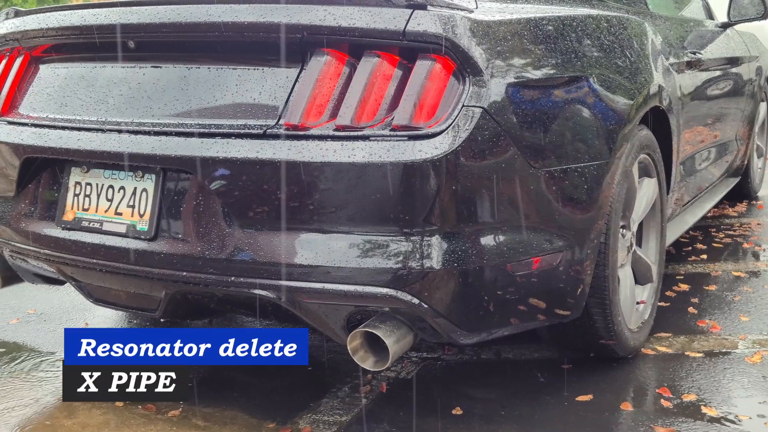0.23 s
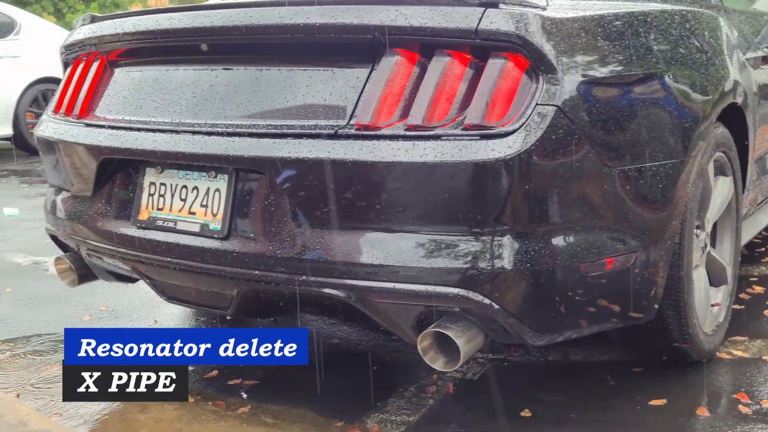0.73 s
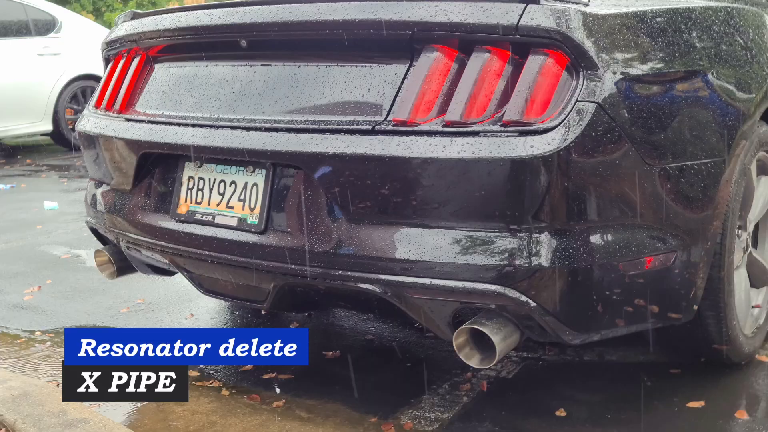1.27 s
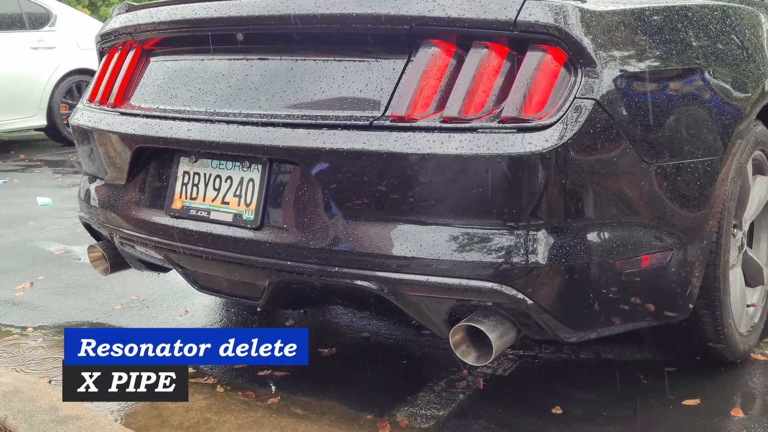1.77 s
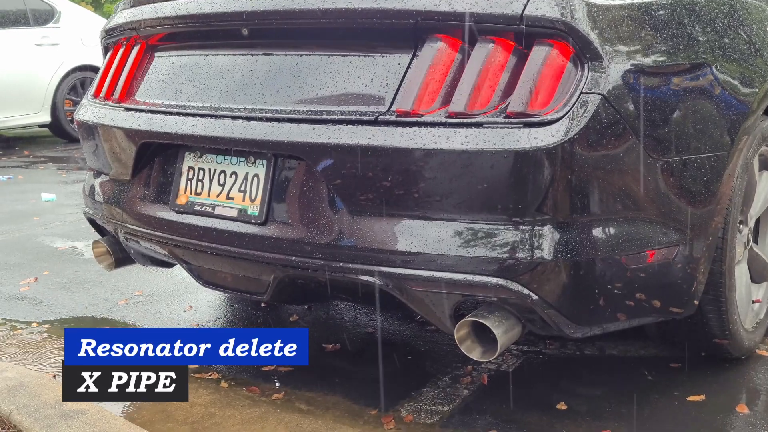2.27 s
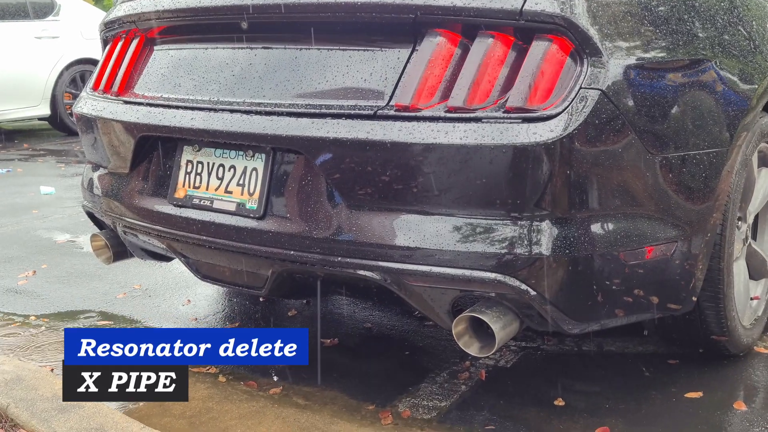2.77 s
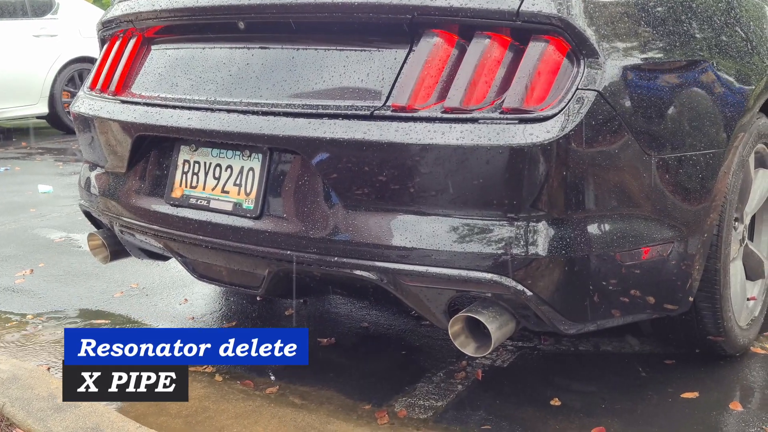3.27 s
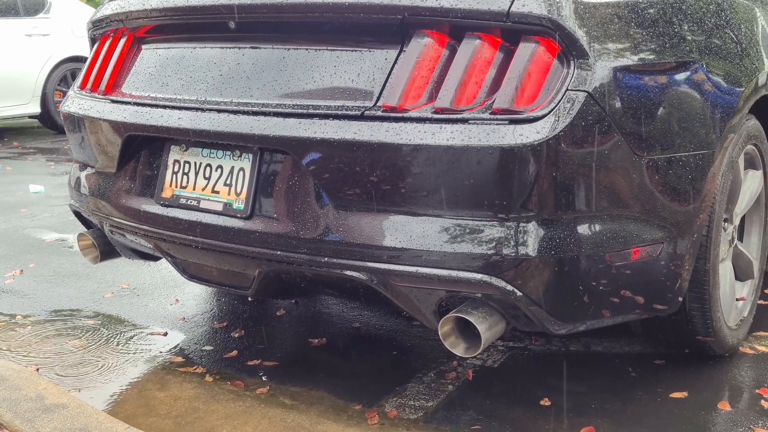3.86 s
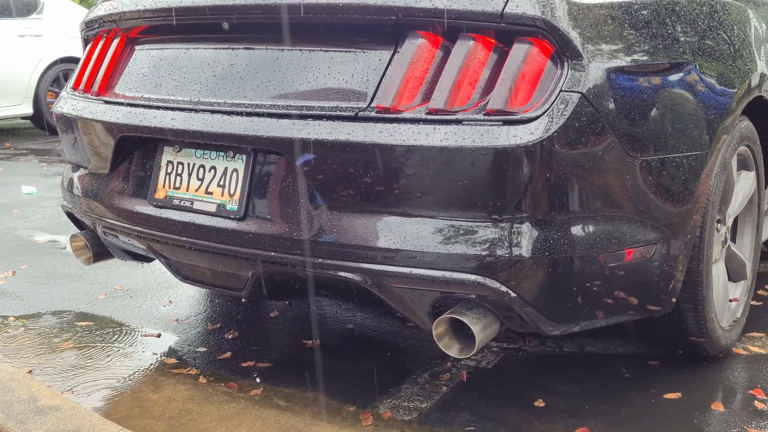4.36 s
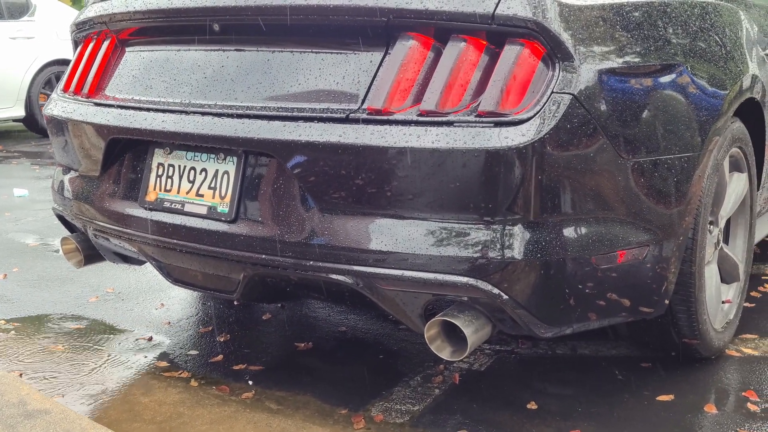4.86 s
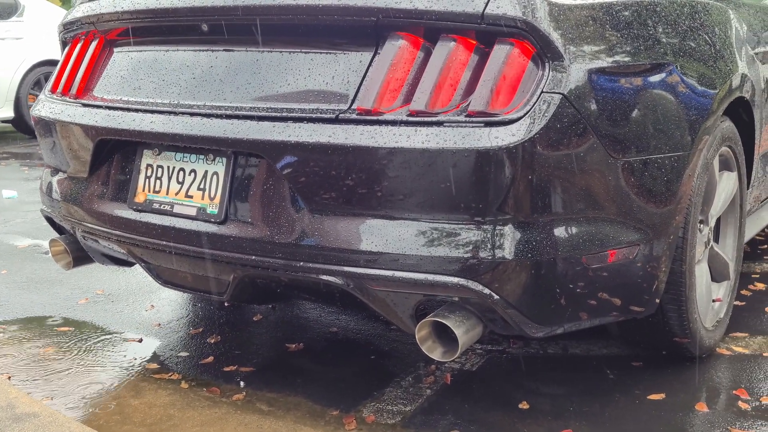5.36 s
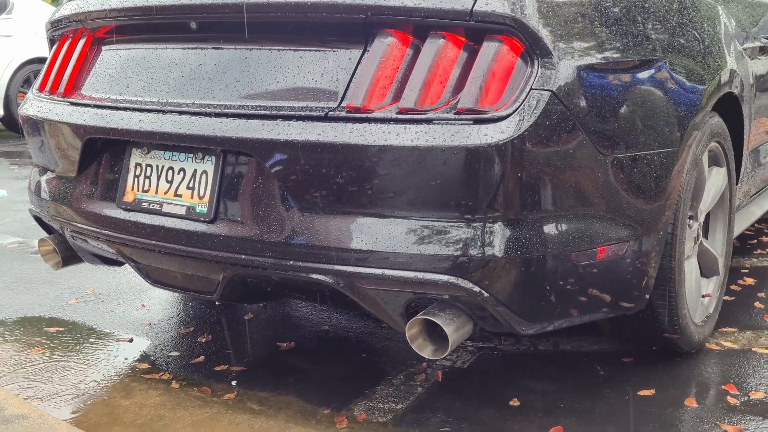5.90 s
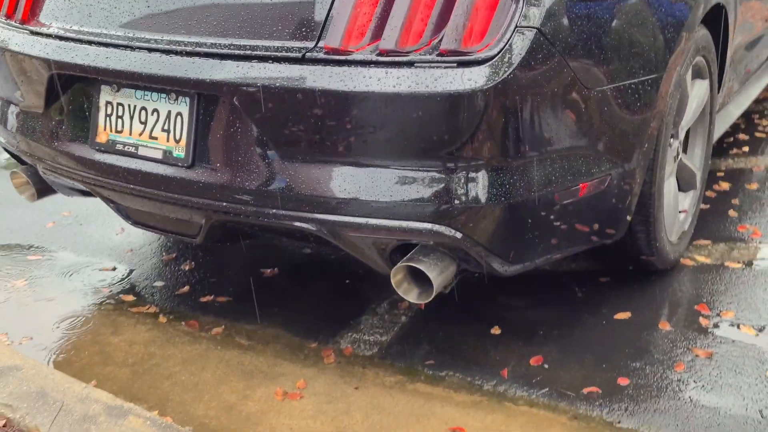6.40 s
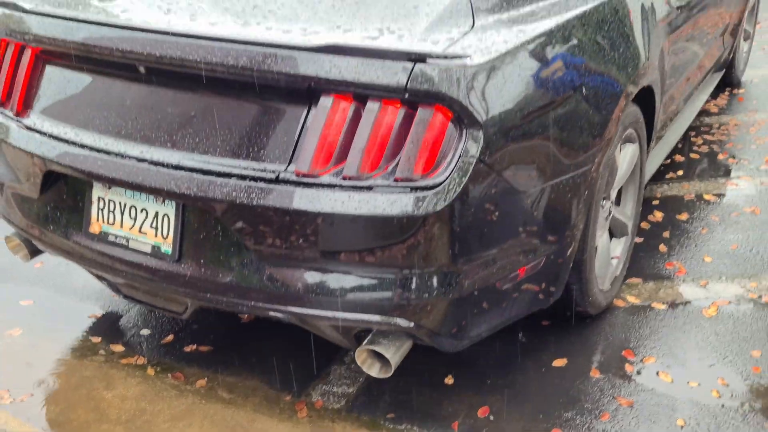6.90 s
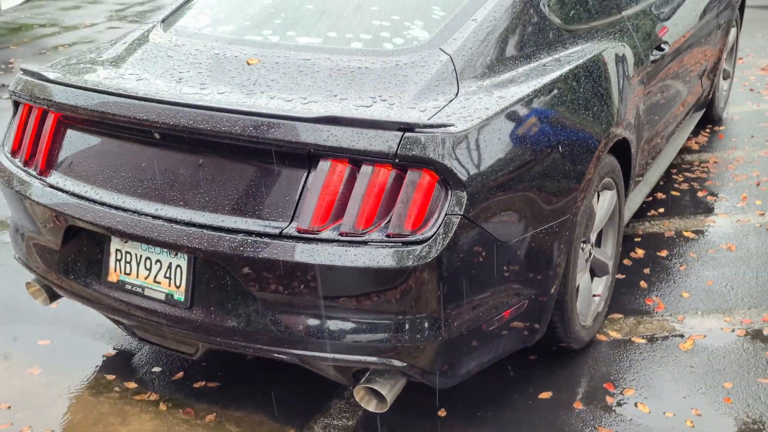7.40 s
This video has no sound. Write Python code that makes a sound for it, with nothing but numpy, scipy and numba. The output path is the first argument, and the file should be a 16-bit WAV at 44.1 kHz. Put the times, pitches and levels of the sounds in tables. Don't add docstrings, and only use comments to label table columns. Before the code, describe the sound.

A big eight-cylinder car engine settles from fast to slow idle through open pipes, deep and lumpy, with rasps, puffs and faint rain hiss.

```python
import sys
import numpy as np
from scipy import signal
from scipy.fft import rfft, irfft
from scipy.io import wavfile
from scipy.ndimage import uniform_filter1d
from numba import njit

SR = 44100
rng = np.random.default_rng(int(sys.argv[2]) if len(sys.argv) > 2 else 0)


def natural_amplitude(level_db):
    exponent = np.asarray(level_db, float) / 20
    return 10 ** exponent


def dump_mix(stems):
    frames = np.atleast_2d(stems).T
    limited = np.clip(frames, -1, 1)
    pcm = np.round(limited * 32767).astype(np.int16)
    wavfile.write(sys.argv[1], SR, pcm)


N = 336924
LEAD = 6615
SIZE = N + LEAD
TIME = np.arange(-.15 * SR, N) / SR
SIDES = np.array([[1], [-1]])

# near_tip_strength, far_tip_strength, body_strength,
# near_tip_lag_ms, far_tip_lag_ms, body_lag_ms
CYLINDERS = [(1.19, 0.25, 0.3, -0.45, -2.74, -0.25), (0.93, 0.45, 0.89, -0.03, -2.82, 4.71),
             (0.98, 0.95, 0.82, -1.01, -0.9, 0.65), (1.06, 0.64, 0.96, -0.07, 0.35, 0.26),
             (1.44, 0.65, 0.92, -0.28, 0.66, 0.06), (1.12, 0.8, 0.49, -0.48, -3.47, 0.03),
             (1.35, 0.57, 0.87, -0.7, -3.95, -0.71), (1.12, 1.02, 0.92, -0.15, -0.07, 0.57)]
# start_s (middle of the swell or
# dip), length_s, level_db
SPITS = [(0.04, 0.0086, 8), (0.142, 0.008, 3.5), (0.239, 0.008, 1.5), (0.339, 0.0071, 5),
         (1.104, 0.0088, -4), (1.272, 0.013, 5), (2.567, 0.018, 7), (3.051, 0.015, 6.5), (3.172, 0.011, 9),
         (3.288, 0.0087, 7), (5.38, 0.0067, -8), (6.583, .015, 4.5), (6.826, .008, -5), (6.893, .008, 0),
         (6.964, 0.0045, 5), (7.038, 0.0084, 6), (7.25, 0.0094, -1), (7.444, .008, -2), (7.567, .008, -6)]


def level(x):
    return x / np.sqrt(np.mean(x ** 2))


def noise():
    return rng.standard_normal(SIZE)


def walk(rate_hz):
    hold = int(SR / rate_hz)
    steps = np.repeat(rng.standard_normal(SIZE // hold + 1), hold)
    smooth = uniform_filter1d(uniform_filter1d(steps, hold), hold)
    return 4 / 3 * smooth[:SIZE]


def curve(table):
    time_s, value = np.transpose(table)
    return np.interp(TIME, time_s, value)


def bumps(table, t):
    return sum(db * np.exp(-((t - s) / length) ** 2) for s, length, db in table)


def clicks(times, sizes):
    place = np.clip(times * SR + LEAD, 0, SIZE - 2)
    whole = place.astype(int)
    part = place - whole
    return np.bincount(whole, sizes * (1 - part), SIZE) + np.bincount(whole + 1, sizes * part, SIZE)


def fade(x, decay_s):
    return signal.lfilter([1], [1, -np.exp(-1 / (decay_s * SR))], x)


def colour(x, table):
    hz, db = np.transpose(table)
    bin_hz = np.arange(len(x) // 2 + 1) * SR / len(x)
    gain = natural_amplitude(np.interp(np.log(bin_hz + 1), np.log(hz), db))
    return irfft(rfft(x) * gain, len(x))


@njit
def svf(x, hz, width):
    y, b, l = np.empty(len(x)), 0., 0.
    g, k = np.tan(np.pi * hz / SR), width / hz
    for i in range(len(x)):
        v = (b + g * (x[i] - l)) / (1 + g * (g + k))
        b, l, y[i] = 2 * v - b, l + 2 * g * v, k * v
    return y


def steep(x, hz, width_hz):
    return svf(svf(x, float(hz), float(width_hz)), float(hz), 2. * width_hz)


def ring(x, modes, lift):
    total = 0
    for k, (hz, width_hz, low_db, high_db) in enumerate(modes):
        gain = natural_amplitude(low_db + lift * (high_db - low_db))
        total = total + (-1) ** k * gain * steep(x, hz, width_hz)
    return total


def rain(gate):
    # pitch_hz, level_db (per Hz)
    rain_colour = [(2000, -28.5), (3200, -15), (4500, -11), (5500, -9.5), (7200, -9.5), (8000, -15.5),
                   (11000, -15.5), (15500, -21)]
    count = 9000
    ports = []
    for _ in range(2):
        sizes = natural_amplitude(1.05 * rng.exponential(size=count)) * noise()[:count]
        drops = clicks(rng.uniform(TIME[0], TIME[-1], count), sizes)
        hiss = (.6 + .4 * gate) * natural_amplitude(1.9 * walk(22)) * noise()
        ports.append(colour(hiss + 0.67 * level(drops), rain_colour))
    shared = 0.12 * (ports[0] + ports[1])
    return level(np.array(ports) + shared)


def rasp():
    # start_s (middle of the swell), length_s, level_db
    rasps = [
        (0.494, 0.022, 17),
        (4.005, .03, 14),
        (4.748, 0.029, 19),
        (5.05, .015, 16),
        (5.14, .04, 22),
        (5.24, .025, 15),
        (6.38, 0.038, 16.5),
    ]
    torn = steep(noise() * natural_amplitude(3.0 * walk(90)), 1490, 920)
    return level(torn) * natural_amplitude(-57 + bumps(rasps, TIME))


def puffs(cycle, lift):
    # place (0-1), level_db
    cycle_puffs = [(.08, 11), (0.223, 8), (0.458, 8), (.685, 3.5), (0.839, 5)]
    # pitch_hz, width_hz, low_phone_db, lifted_phone_db
    puff_modes = [(2575, 230, -8.5, -4), (2947, 290, 4, 2.5), (3280, 240, -1.5, -7.5),
                  (3806, 580, 4.5, 3.5), (4300, 170, 5, 5.5), (4610, 390, 1, 0), (5570, 310, -10.5, -21.5),
                  (6560, 300, -14, -37)]
    place, db = np.transpose(cycle_puffs)
    turns = (np.arange(-2, int(cycle[-1]) + 1)[:, None] + place).ravel()
    size = natural_amplitude(np.resize(db, len(turns)) + 2.2 * rng.standard_normal(len(turns)))
    size = size * (turns > cycle[0])
    starts = clicks(np.interp(turns, cycle, TIME) - .003, size)
    gate = fade(fade(starts, 0.00029), 0.009)
    gate = gate / gate.mean() + 1.47
    mid, side = (ring(gate * noise(), puff_modes, lift) for _ in range(2))
    side = .5 * side + .7 * np.roll(mid, 9)
    return (mid + side * SIDES) / np.std(mid), gate / gate.mean()


def cracks(times, which, lift):
    front_db = [-1, 0, -12, 2.5, 0, 0, 1, 0]
    # pitch_hz, width_hz, low_phone_db, lifted_phone_db
    crack_modes = [(868, 112, -18.5, 12.5), (1051, 85, -4, 1), (1175, 105, 2.5, -1.5), (1352, 74, -6, 16.5),
                   (1466, 66, 1.5, -9.5), (1759, 213, -5.5, 4.5), (2198, 116, -36, 8.5),
                   (2367, 120, -19.5, -6.5)]
    chance_db = 1.6 * rng.standard_normal(len(times))
    size = natural_amplitude(np.array(front_db)[which] + bumps(SPITS, times) + chance_db)
    front = clicks(times - 0.003487, size)
    gate = fade(front, .004) + .33
    mid, side = (ring(gate * noise(), crack_modes, lift) for _ in range(2))
    mid = mid + 7.5 * ring(front, crack_modes, lift)
    side = .35 * side + .4 * np.roll(mid, 25)
    heard = mid + side * SIDES
    return heard / np.sqrt(uniform_filter1d(mid ** 2, size=SR // 2))


def bumper(times, lift):
    rung = steep(clicks(times, np.ones(len(times))), 516.5, 22.)
    return level(rung) * np.clip((lift - .4) / .28, 0, 1)


def bark(times, which, lift):
    tip_db = [-5.5, 6, 6, 10, -5.5, 1, 1, 8]
    # pitch_hz, width_hz, low_phone_db, lifted_phone_db
    bark_modes = [(346, 88, -1.5, 5.5), (463, 31, 17, -52.5), (513.6, 66, -6.5, -3.5),
                  (570, 42, 0.5, -19.5), (639, 62, -16, -4.5)]
    late, loud = rng.standard_normal((len(times), 2)).T
    far_lag_s = np.array(CYLINDERS)[which, 4] / 1000
    starts = times - 0.001968 + far_lag_s + .00015 * late
    pulses = clicks(starts, natural_amplitude(np.array(tip_db)[which] + 1.5 * loud))
    flow = level(fade(pulses, 0.005)) * noise()
    return level(ring(level(pulses) + .45 * flow, bark_modes, lift))


def boom(times, which, lift):
    # pitch_hz, width_hz, near_tip_gain, far_tip_gain, body_gain (minus = inverted)
    pipe_modes = [(51, 8, -7.85, 1.07, 3.56), (65, 70, -0.34, -0.92, -0.23), (95, 8, -7.7, -3.59, 0.05),
                  (109, 26, 2.39, -0.61, 0.9), (131, 23, 0.36, 2.14, 1.82), (158, 51, -0.38, 1.99, -2.75),
                  (166, 21, 0.99, -1.12, 3.33), (194, 15, 1.35, -0.97, -0.03),
                  (235, 24, -0.57, -0.43, 0.77), (257, 21, 1.12, -0.06, -2.02),
                  (281, 14, 0.06, -0.18, 1.76), (320, 43, 0.32, 0.96, 0.13), (335, 28, 0.07, -1.18, -0.25),
                  (401, 17, 0.07, -0.16, 0.01), (450, 17, 0.09, 0.15, -0.08), (504, 36, 0.07, -0.01, 0.08),
                  (527, 22, -0.06, -0.07, -0.01), (565, 36, 0.07, -0.03, -0.02)]
    # pitch_hz, level_db
    long_pipe = [(335, 0), (390, -10), (520, -8), (700, -20)]
    # pitch_hz, level_db
    boom_colour = [(25, 1), (40, -9.5), (55, 2), (130, 2.5), (200, 4), (330, 3.5), (600, 7), (800, -7.5),
                   (1300, -56)]
    chance = rng.standard_normal((len(times), 4)).T
    cold = 1 + 4.3 * np.exp(-np.maximum(times, 0) / 3.5)
    low, high = 0, 0
    for path in range(3):
        strength, lag_ms = np.array(CYLINDERS)[which][:, path::3].T
        size = strength + .035 * cold * chance[path]
        late_ms = lag_ms + .05 * cold * chance[3]
        pulses = clicks(times + late_ms / 1000, size)
        for mode in pipe_modes:
            rung = mode[2 + path] * svf(pulses, float(mode[0]), float(mode[1]))
            if mode[0] < 380:
                low = low + rung
            else:
                high = high + rung
    out = colour(colour(low, long_pipe) + high * natural_amplitude(7.5 - 25.5 * lift), boom_colour)
    fast = np.exp(-(np.maximum(TIME, 0) / 0.79) ** 2)
    change = .5 * svf(out, 90., 26.) - 0.42 * svf(out, 166., 56.) - 0.58 * svf(out, 236., 50.)
    change = change + 0.63 * svf(out, 281., 59.) + 1.5 * svf(out, 352., 40.)
    out = out + fast * change
    out = out + lift * (.4 * svf(out, 195., 50.) - .2 * svf(out, 260., 40.))
    return out / np.sqrt(uniform_filter1d(out ** 2, size=SR // 2))


def scene():
    # time_s, speed_rpm
    crank_speed = [(0, 1277.2), (.24, 1221.6), (.62, 1116.9), (.8, 1077.8), (1.01, 1052.8), (2.11, 1007.5),
                   (2.55, 997.7), (3.03, 1002.2), (3.47, 997.2), (3.91, 964.0), (4.38, 971.0),
                   (4.84, 947.9), (5.39, 960.7), (5.88, 955.2), (6.1, 958.0), (6.8, 969.2), (7.64, 978.1)]
    # time_s, effort_db
    gas_effort = [(0, 3.5), (.15, 3), (.4, 1.5), (1.5, -1), (2.1, -0.5), (3.9, -.5), (4.2, 2.5), (4.8, 0),
                  (5.1, 3.5), (5.4, 1), (6.0, 1), (6.3, 3), (6.7, 1), (7.2, -1), (7.64, 3)]
    # time_s, height (0 low - 1 high)
    phone_height = [
        (0, 0.33),
        (1.0, 0.29),
        (6.2, 0.2),
        (6.6, 0.35),
        (6.9, 0.71),
        (7.2, 0.83),
        (7.64, 0.59),
    ]
    # start_s (middle of the swell), length_s, level_db
    flurries = [(0.079, 0.01, 1), (0.487, 0.012, 5), (0.541, .006, 9), (.7, .02, 4), (1.032, .008, 5.5),
                (1.276, 0.011, 3.5), (1.751, 0.11, 1.5), (2.944, 0.016, 4.5), (3.283, .01, 3.5),
                (4.582, 0.011, 5.5), (5.06, 0.016, 4.5), (5.462, 0.0071, 4.5), (6.496, 0.062, 4),
                (7.423, .008, -1.5)]
    rpm, effort_db, lift = curve(crank_speed), curve(gas_effort), curve(phone_height)

    firings = np.cumsum(rpm) / 15 / SR
    firings = firings - firings[LEAD]
    count = np.arange(int(firings[0]), int(firings[-1]))
    times = np.interp(count + .79, firings, TIME)
    which = count % 8

    fast = (rpm - 960) / 300
    load = .5 + .5 * np.tanh((TIME - 3.5) / 0.13)
    boom_db = -11.5 - .3 * fast - 1.36 * lift
    crack_db = -39 + effort_db + 9 * (lift - .25)
    puff_db = -51.5 + 0.64 * effort_db + 1 * fast + 2.5 * load + 0 * lift
    puff_db = puff_db + 0.35 * bumps(SPITS, TIME) + 1.4 * walk(6.5)
    hiss_db = -54 + .4 * effort_db + 6 * fast + 0.5 * load - 2 * lift + bumps(flurries, TIME)

    gas, gate = puffs((firings - .39) / 8, lift)
    high = rain(gate) * natural_amplitude(hiss_db) + rasp() + gas * natural_amplitude(puff_db)
    high = high + cracks(times, which, lift) * natural_amplitude(crack_db)
    tips = bark(times, which, lift) * natural_amplitude(boom_db - 21.0) + bumper(times, lift) * natural_amplitude(boom_db - 31.5)
    tips = tips + 0.29 * np.roll(tips, 90) * SIDES
    low = boom(times, which, lift) * natural_amplitude(boom_db)
    wide = 0.12 * svf(np.roll(low, 42), 210.0, 380.0) * SIDES
    return (low + wide + tips + high)[:, LEAD:]


def roll_off(x):
    return signal.sosfilt(signal.butter(12, 15630, fs=SR, output="sos"), x)


def record(dry):
    # pitch_hz, level_db
    port_balance = [(60, -1.5), (130, -1.5), (260, -1.5), (500, -2.4), (1200, 2.6), (1800, 2), (3500, -4.5),
                    (4700, -5), (6000, 0), (7500, -3.5), (12000, 5.5)]
    hz, db = np.transpose(port_balance)
    left = colour(dry[0], np.c_[hz, db / 2])
    right = colour(dry[1], np.c_[hz, -db / 2])
    wet = np.array([left, right])
    return roll_off(np.tanh(.5 * wet) / .5)


dry = scene()
out = record(dry)
dump_mix(out)
```